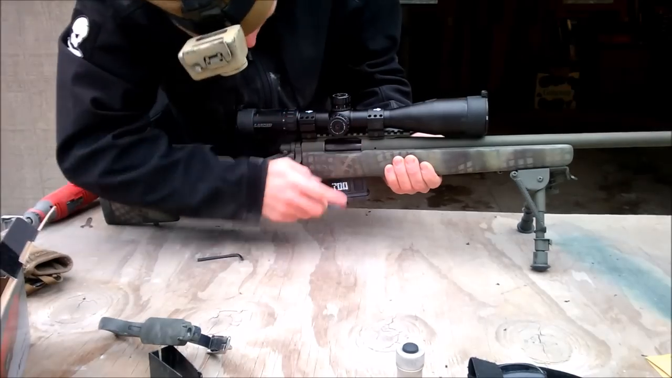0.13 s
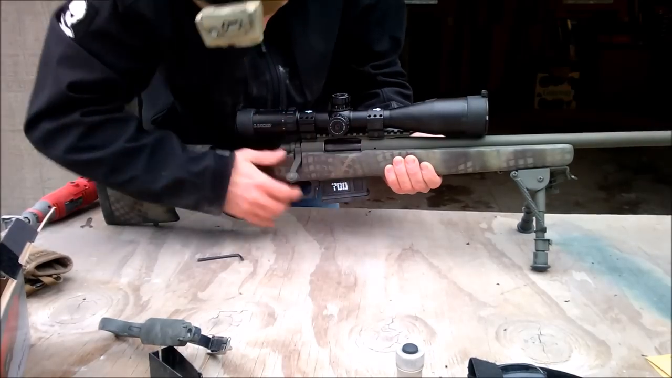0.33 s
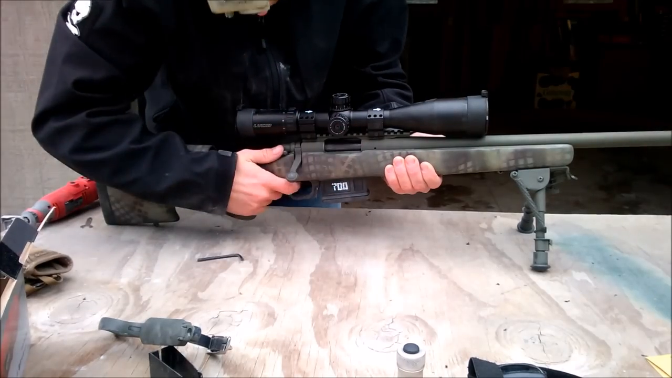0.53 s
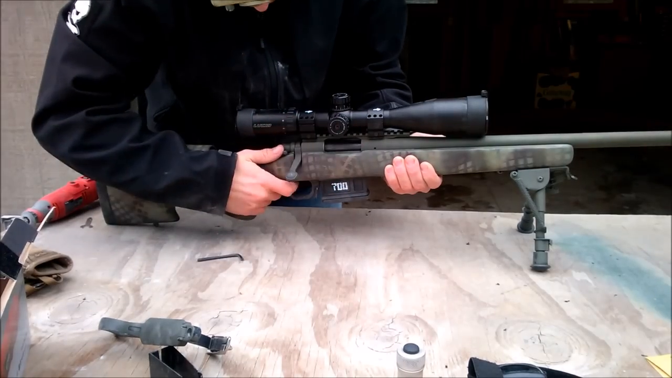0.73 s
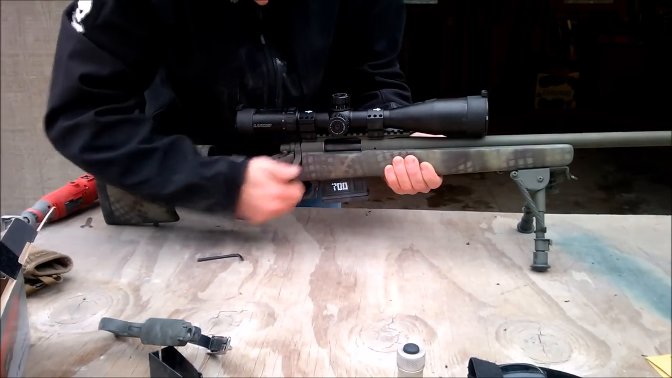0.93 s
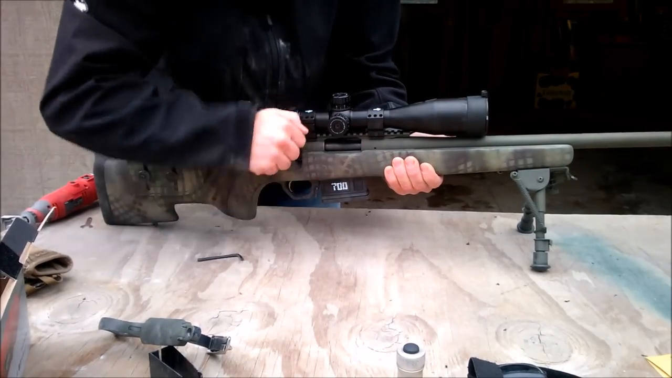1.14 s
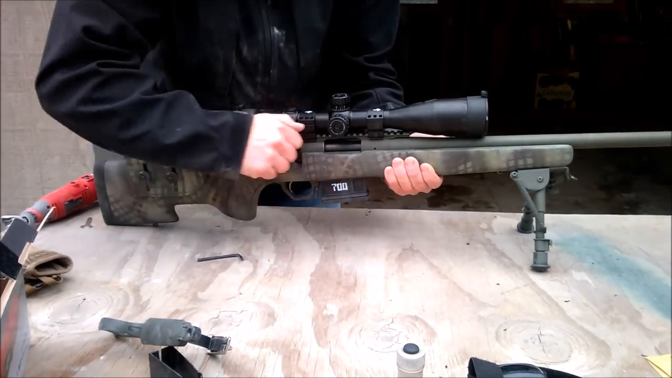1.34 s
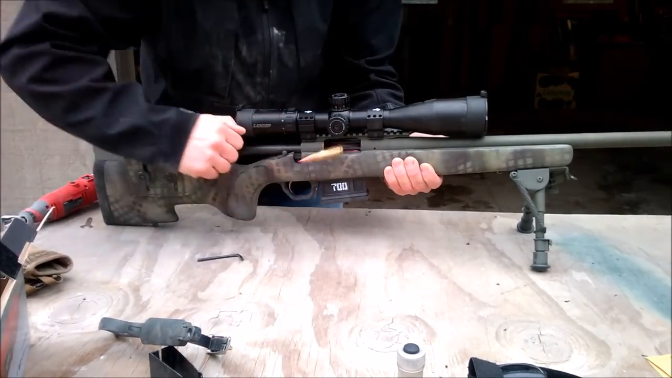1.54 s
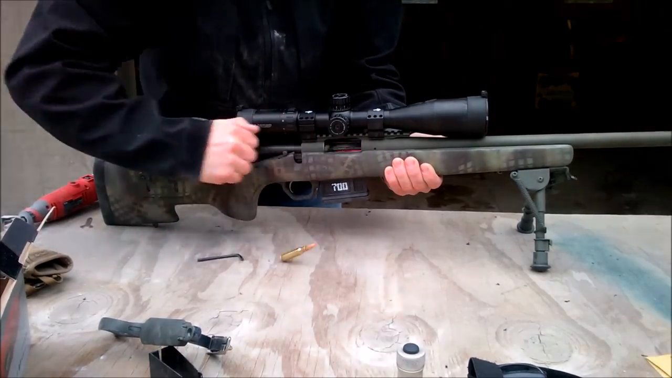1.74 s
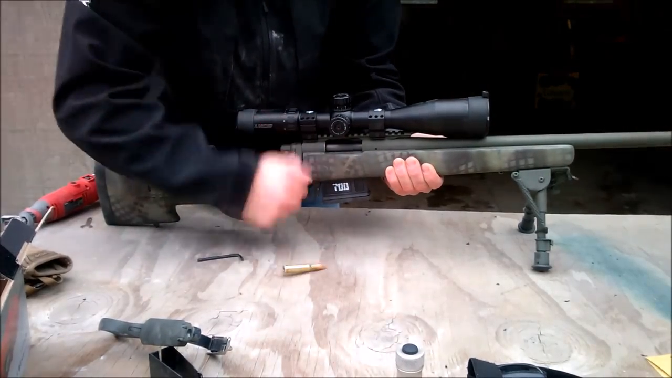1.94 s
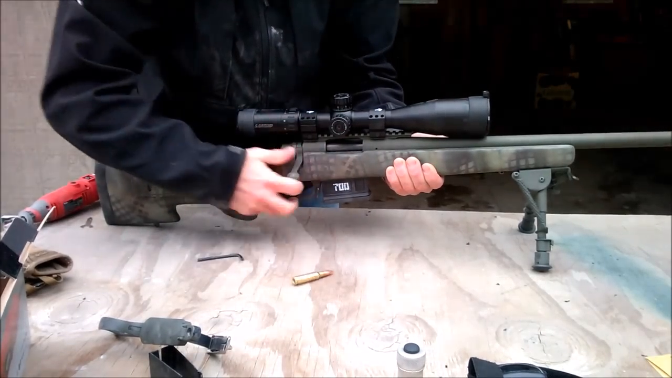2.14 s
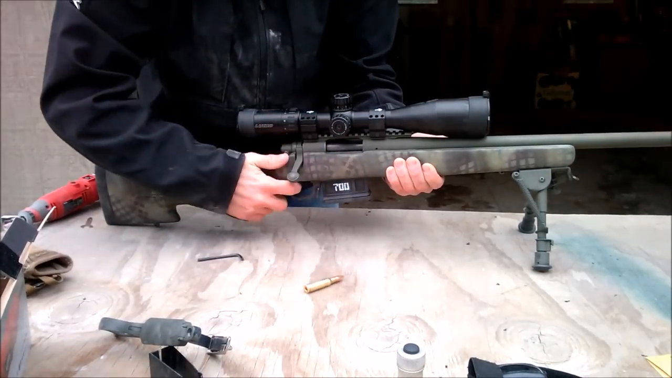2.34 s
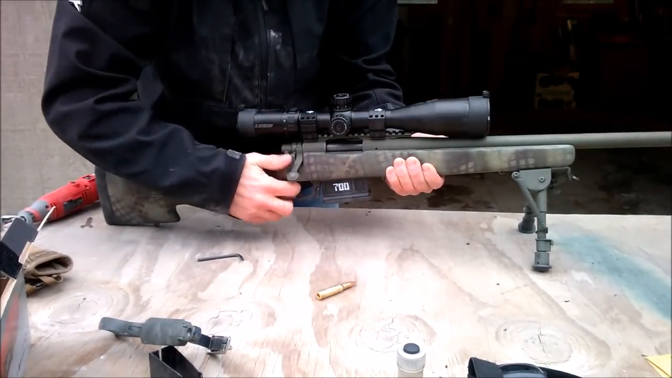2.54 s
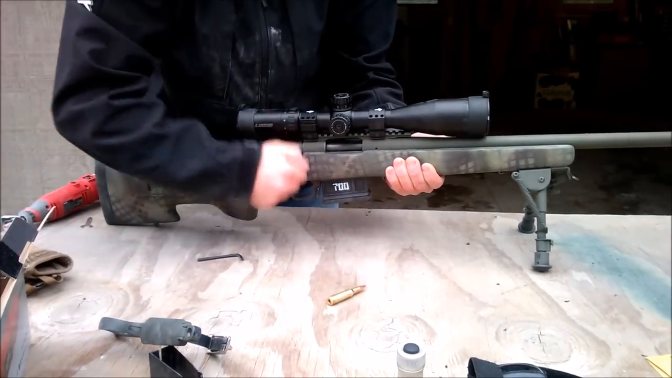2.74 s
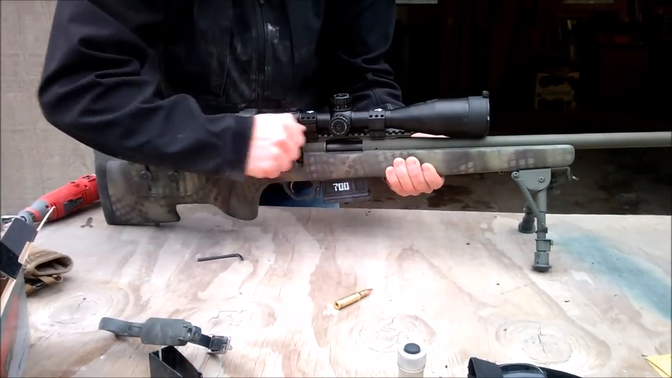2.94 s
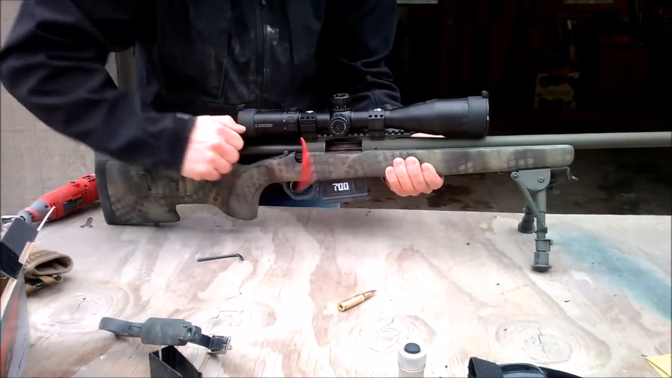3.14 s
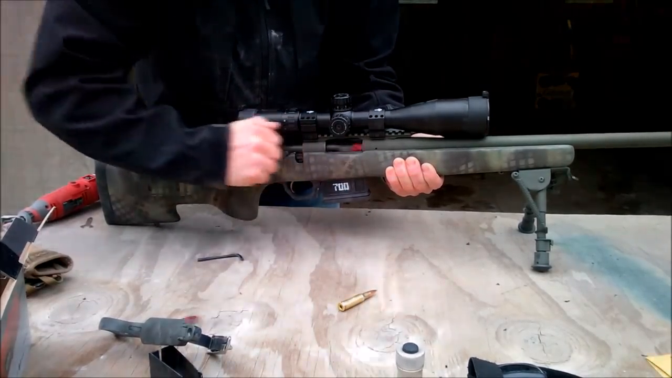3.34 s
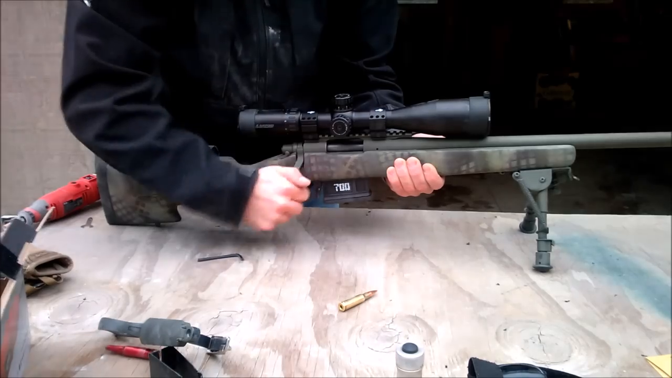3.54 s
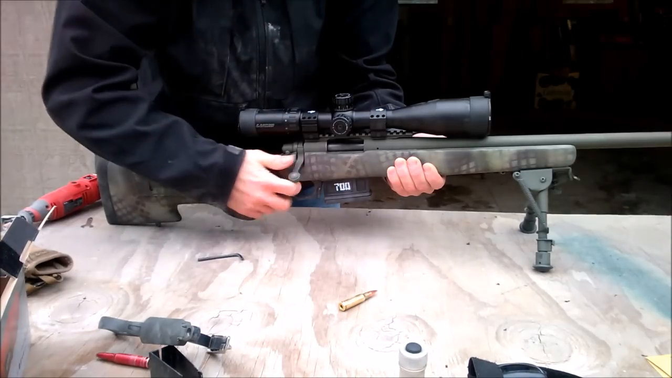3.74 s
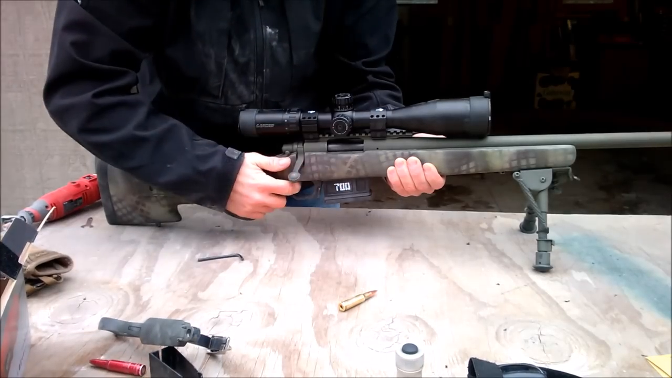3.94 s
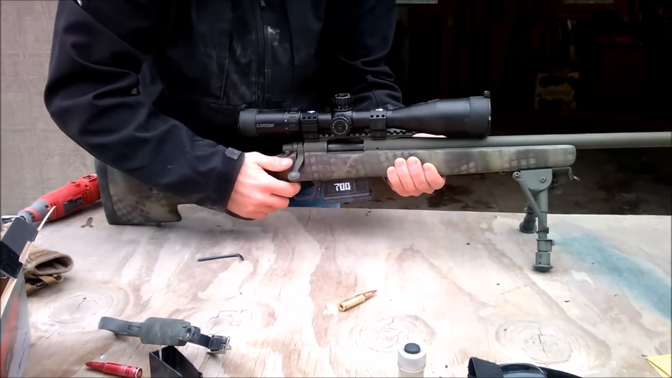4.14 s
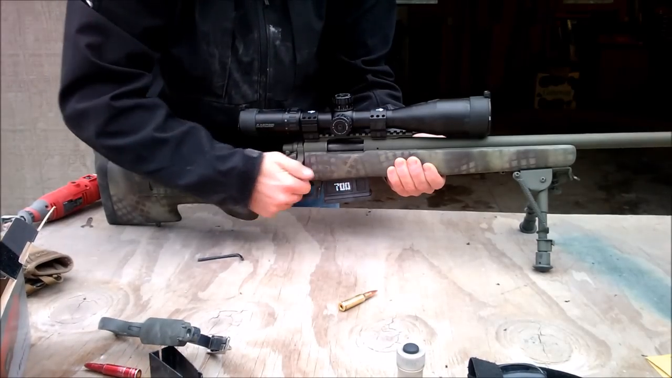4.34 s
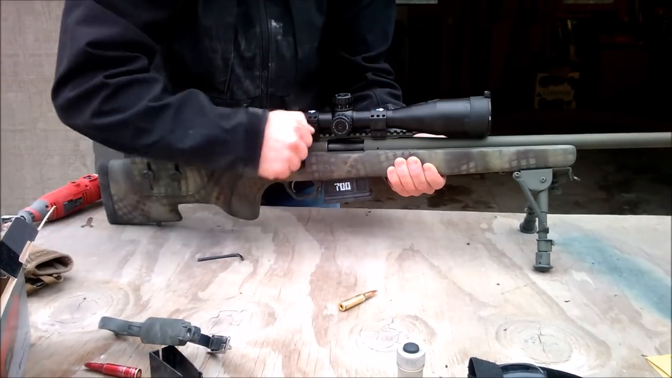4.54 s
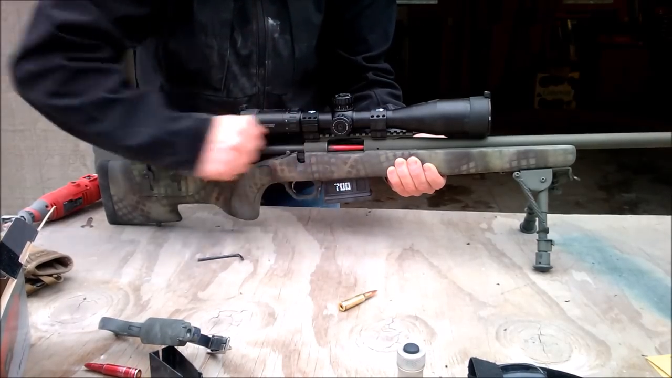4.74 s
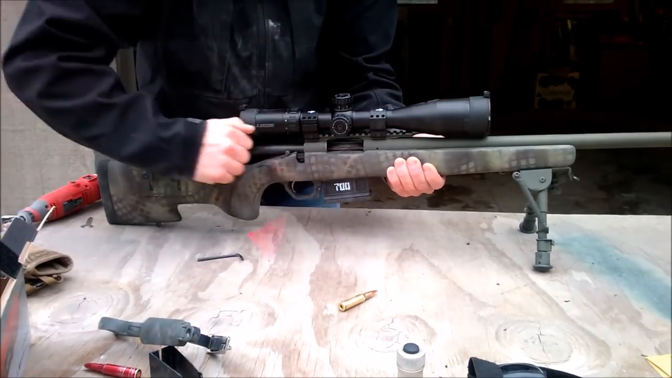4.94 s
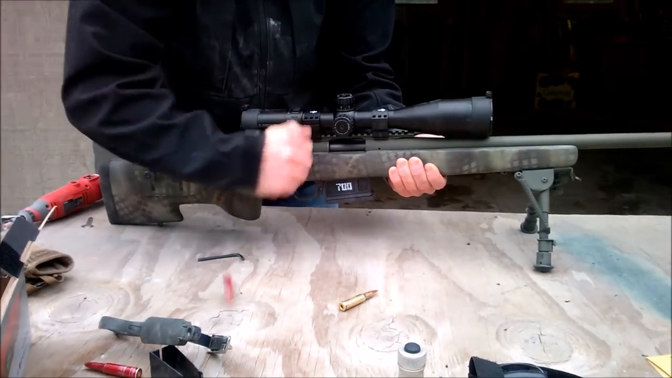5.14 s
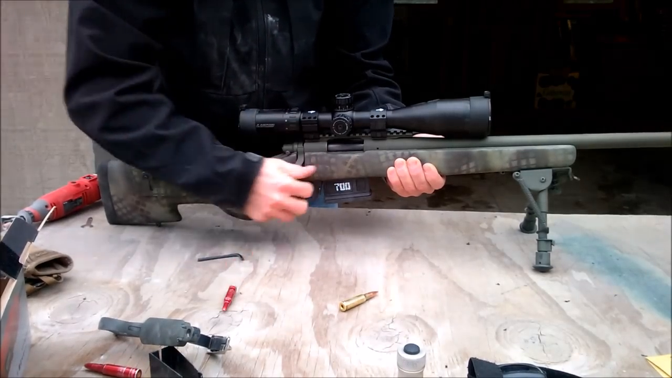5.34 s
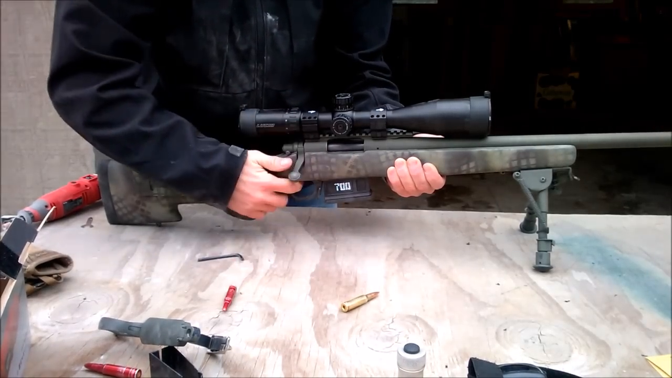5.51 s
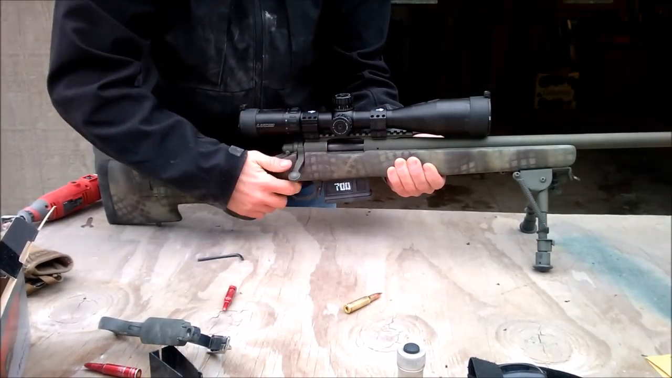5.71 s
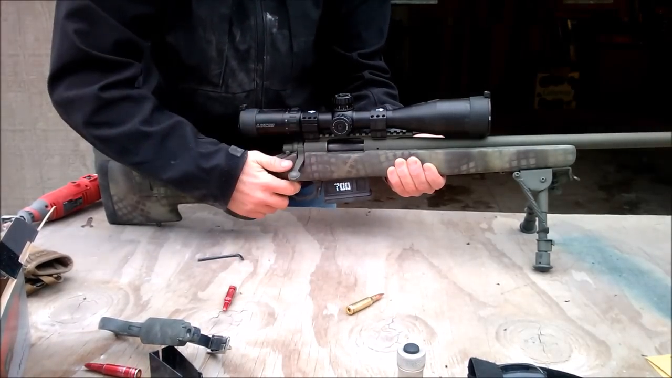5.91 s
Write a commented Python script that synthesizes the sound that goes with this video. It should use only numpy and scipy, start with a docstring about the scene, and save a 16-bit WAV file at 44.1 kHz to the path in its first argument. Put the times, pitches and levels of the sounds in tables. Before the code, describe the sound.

Steel clicks, short scrapes and empty trigger snaps from a bolt-action rifle, with cartridges bouncing on plywood in a workshop.

```python
"""A bolt-action rifle is dry-fired on a plywood bench in a workshop. First the bolt shuts and the striker
snaps, its impact ringing the steel. Then, three times, the handle lifts, the bolt scrapes back to its stop, an
ejected round bounces on the plywood, the bolt slides home and locks, and the striker snaps again. Throughout, a
loose round rocks on the bench, the bench rumbles under the hands, and the room echoes and hisses. A small
camera hears it all through two ports, with gain control."""
import sys
import numpy as np
from scipy import signal
from scipy.fft import rfft, irfft, next_fast_len
from scipy.io import wavfile
from scipy.ndimage import map_coordinates

SR = 44100
rng = np.random.default_rng(int(sys.argv[2]) if len(sys.argv) > 2 else 0)


def log_audio(samples):
    """Write samples as a 16-bit WAV file to the path given in sys.argv[1]."""
    # one column per channel
    frames = np.atleast_2d(samples).T
    # limit to full scale, then quantise
    limited = np.clip(frames, -1, 1)
    pcm = np.round(limited * 32767).astype(np.int16)
    wavfile.write(sys.argv[1], SR, pcm)


N = 267687

# striker snaps; soft taps of something rocking on the panel: (time [s], level [dB])
STRIKER = [(0.773, -4.5), (2.517, -6), (4.164, -4.5), (5.957, -5)]
ROCKING = [(0.419, -35), (0.48, -30), (0.518, -32.5), (3.844, -27), (3.916, -24.5), (3.981, -20.5),
           (4.051, -28), (4.112, -20), (4.368, -29.5), (4.446, -31), (5.491, -23.5), (5.55, -40),
           (5.63, -33), (5.729, -34.5)]
# steel contacts of the bolt's cycle: (time [s], force on the action [dB])
LIFT = [(1.197, -0.5), (2.9, -1.5), (4.605, -3)]  # the handle cams up
FREE = [(1.399, -12.5), (3.038, -16), (4.747, -11.5)]  # the lugs come clear
REAR = [(1.554, 2.7), (3.159, 8.7), (4.868, 8.3)]  # the bolt meets its rear stop
HOME = [(1.923, -1), (3.508, 3.5), (5.201, -3.5)]  # the bolt face meets the barrel
DOWN = [(0.172, -14.5), (2.061, -17), (3.64, -10), (5.335, -18.5)]  # the handle is pushed down
# what each contact passes on, levels relative to the action:
# (contacts, bench [dB], bolt [dB], rise [s], t60 [s], clack [dB])
PASSES = [(LIFT, -8.5, -.5, .004, 0.02, -16.5), (FREE, -18, -3, 0.0024, 0.019, -26),
          (REAR, -6.5, -0.71, .009, 0.031, -18.5), (HOME, -14, -1.5, .002, 0.017, -20.5),
          (DOWN, -0.69, -4.5, .003, 0.019, -9.5)]
# modes of the bench and of its top panel: (frequency [Hz], bandwidth [Hz], level [dB])
BENCH = [(146, 63, -4.5), (258, 40, 1.5), (332.7, 44, 5.5), (468, 173, 5)]
PANEL = [(651.7, 81, 0), (838, 120, -1.5), (1153, 150, -5), (1338, 69, -2.5), (1650, 230, -8)]
CLACK_S, SETTLE_S = .003004, .055  # delays: contact to square meeting, lift to the rifle dropping back


def striker(force):
    """Impact and rebound: the sear lets go, the striker hits its seat and bounces once."""
    for s, db in STRIKER:
        impact(force["bolt"], s - .002, db - 21, .03, .002, .5)  # sear
        impact(force["action"], s + .0022, db - 2.5, .022, .001, .6, blow=1.7)
        impact(force["action"], s + .0069, db - 6, .02, .001, .6, blow=9)  # rebound
        impact(force["bolt"], s + .0024, db + 4.5, .009, .0003, .6, blow=1.7)
        impact(force["bench"], s + .0033, db - 18.5, .03, .001, .3, blow=2.8)


def bolt_contacts(force):
    """Structure-borne sound: each steel contact shakes action and bolt and passes into the bench."""
    # ticks of bolt, handle and cartridges: (time [s], force [dB], bolt relative to action [dB])
    ticks = [(0.008, -7.5, 6.5), (0.097, -18, -25), (0.131, -18.5, 3), (1.104, -30, -6),
             (1.168, -21.5, -19), (1.493, -12.5, -12), (1.522, -11, 3.5), (1.544, -2, -20), (1.563, -9, 4),
             (1.864, -6, -10), (1.874, -9, 7), (2.889, -13, -13), (3.104, -20, 6), (3.128, -15, 7),
             (3.321, -27, -11), (3.411, -9, -9), (3.45, -0.5, 1.5), (3.555, -8.5, 4), (3.627, -17, -3.5),
             (4.817, -18, 7.5), (4.838, -9, 5.5), (5.023, -25.5, -0.5), (5.13, -9.5, 2), (5.154, -7, -12.5)]
    contacts = [(s, db, *kind) for rows, *kind, _ in PASSES for s, db in rows]
    contacts += [(s, db, -10, bolt_db, .003, .02) for s, db, bolt_db in ticks]
    for s, db, bench_db, bolt_db, rise, t60 in contacts:
        s -= rise / 2  # the parts scrape before they meet squarely
        impact(force["action"], s, db, t60, rise, .6)
        impact(force["bolt"], s, db + bolt_db, .78 * t60, rise, .6)
        impact(force["bench"], s, db + bench_db, .04, rise, .3)
        impact(force["panel"], s, db + bench_db + 3, .03, rise, .3)


def clacks(force):
    """Momentum transfer: parts meeting squarely drive a sharp blow into the plywood."""
    for rows, *_, clack_db in PASSES:
        for s, db in rows:
            impact(force["dent"], s + CLACK_S, db + clack_db, .012, .001, .5, blow=2.3)
            impact(force["panel"], s + CLACK_S, db + clack_db, .012, .001, .5, blow=7)


def bolt_slides(force):
    """Stick-slip friction: the bolt catches and slips in its raceway, loudest where it is fastest."""
    # (start [s], fastest [s], stop [s], scrape [dB], hiss relative to scrape [dB])
    slides = [(-.05, 0, .06, -28, -10), (1.41, 1.555, 1.61, -28, -6), (1.82, 1.89, 1.95, -34, -4),
              (2.8, 2.87, 2.92, -47, -9), (3.05, 3.155, 3.21, -30, -3), (3.43, 3.47, 3.54, -20, -6),
              (3.53, 3.57, 3.66, -39, -5), (4.5, 4.6, 4.63, -43, -14), (4.78, 4.865, 4.93, -27, -4),
              (5.09, 5.15, 5.25, -35, -6)]
    t = np.arange(N) / SR
    grit = rng.standard_normal((2, N)) * amp(4 * wobble(400) + 2 * wobble(70) - 3)
    for start, fastest, stop, db, hiss_db in slides:
        touch = np.clip(np.minimum(t - start, stop - t) / .019, 0, 1)
        level_db = db + np.interp(t, [start, fastest, stop], [-18, 0, -24.5])
        force["action"][:N] += touch * amp(level_db) * grit[0]
        force["bolt"][:N] += touch * amp(level_db + hiss_db) * grit[1]


def ejector(force):
    """Elastic release: the ejector spring flicks a round out with one short snap."""
    # (time [s], force [dB], bolt relative to ejector [dB])
    flicks = [(3.189, -6.5, 5), (4.9052, -0.5, -12.5)]
    for s, db, bolt_db in flicks:
        impact(force["spring"], s, db, .011, .001, .5)
        impact(force["bolt"], s, db + bolt_db, .009, .001, .5)


def falling_rounds(force):
    """Inelastic collision: at each landing a round touches the plywood three times, ever weaker."""
    # (time [s], force [dB], tapped spot relative to that force [dB])
    landings = [(1.7658, -3, -3.5), (1.7743, -4, -0.5), (2.027, -25.5, -10), (2.036, -16, -7.5),
                (2.075, -20, 0), (2.102, -22.5, -0.5), (2.132, -28.5, -19), (2.238, -35.5, -38),
                (2.298, -36.5, -31), (2.3075, -37, -32), (3.3691, -6.5, -12), (3.4317, -3.5, -1),
                (3.5453, -13, 1.5), (5.0934, -1, -16.5), (5.2788, -15.5, 14.5), (5.2831, -10.5, 6.5),
                (5.359, -18.5, -2), (5.403, -27.5, -16)]
    gap_s, loss_db = .0019, 5
    for s, db, spot_db in landings:
        for k in range(3):
            at = s + k * gap_s * rng.normal(1, .11)
            touch_db = db - k * loss_db
            impact(force["dent"], at, touch_db - 3.5, .007, .001, .5, blow=9.3)
            impact(force["tap"], at, touch_db + spot_db, .016, .001, .6, blow=2.9)
        impact(force["panel"], s, db - 3, .03, .002, .7, blow=6.4)
        impact(force["bench"], s, db - 7.5, .04, .002, .5, blow=6)
        impact(force["bolt"], s, db + spot_db - 26.5, .004, .0002, .5)


def bench_knocks(force):
    """Cushioned impact: the feet push and scuff the bench as the rifle settles and shifts, and a loose round
    rocks on the panel in soft taps."""
    # the rifle shifts: (time [s], push [dB])
    knocks = [(0.319, -33.5), (0.355, -37), (0.385, -40), (1.303, -31), (1.346, -33.5), (1.427, -30),
              (1.703, -34.5), (2.212, -31.5), (2.363, -37), (3.014, -27), (3.597, -18.5), (3.722, -28),
              (3.757, -38), (3.796, -35.5)]
    for s, db in LIFT:
        impact(force["push"], s + SETTLE_S, db - 20, .09, .003, .3, blow=26)
        impact(force["scuff"], s + SETTLE_S, db - 21, .09, .006, .3)
    for s, db in knocks:
        impact(force["push"], s + .003, db, .07, .003, .3, blow=4.5)
        impact(force["scuff"], s + .003, db + 10, .014, .001, .3, blow=7)
    for s, db in ROCKING:
        impact(force["scuff"], s, db - 5, .04, .002, .3)


def ring_tones():
    """Free vibration: single modes of struck parts die away as damped sinusoids."""
    # cartridges and small steel parts: (time [s], frequency [Hz], level [dB], t60 [s])
    pings = [(1.521, 12020, -37, .12), (1.554, 12020, -28, .2), (1.872, 12000, -24, 0.064),
             (2.145, 7000, -46, .05), (3.41, 3480, -19, .035), (3.555, 11400, -42, .25),
             (3.556, 5000, -24, .035), (4.748, 4500, -25, .03), (5.298, 3500, -30, .03)]
    # stock and firing pin: (frequency [Hz], level relative to the snap [dB], t60 [s])
    pin_modes = [(323, -28, .11), (565, -27, .06), (1225, -5, .032), (1690, -11, .025), (3430, -14, .08),
                 (4080, -14, .035), (10150, -14, .02)]
    panel_hz, receiver_hz, hollow_bench_hz = 370, 1200, 249.9
    rows = [(s, panel_hz * rng.normal(1, .02), db, .05, .0035) for s, db in ROCKING]
    rows += [(*ping, .002) for ping in pings]
    rows += [(s + .002, hz, db + mode_db, t60, .0005)
             for s, db in STRIKER for hz, mode_db, t60 in pin_modes]
    rows += [(s + CLACK_S, receiver_hz * rng.normal(1, .037), db - 23.5, .023, .0005) for s, db in REAR]
    rows += [(s + SETTLE_S, hollow_bench_hz, db - 24, .13, .001) for s, db in LIFT]
    out, t = np.zeros(N + SR), np.arange(SR // 3) / SR
    for s, hz, db, t60, rise in rows:
        envelope = amp(db - 60 * t / t60) * (1 - np.exp(-t / rise)) ** 2
        out[round(s * SR):][:len(t)] += envelope * np.sin(2 * np.pi * hz * t)
    return out[:N] * amp(3 * wobble(150))  # loose parts make every ring waver


def rifle():
    """Modal response: each body rings under its forces; wood sheds treble, rubber feet most of all."""
    # modes: (frequency [Hz], bandwidth [Hz], level [dB])
    action_modes = [(1220, 300, -1.5), (1525, 130, -4.5), (2090, 850, -10), (3040, 310, 0.5),
                    (3470, 360, -4), (4240, 580, -3.5), (5150, 1100, -8)]
    bolt_modes = [(5480, 1100, 0), (6750, 540, 0.5), (7920, 840, 1.5), (10000, 600, 1), (11200, 1100, 1),
                  (15000, 1700, -12.5)]
    spring_modes = [(3460, 410, 1), (4510, 700, -6.5), (5600, 1100, -7.5)]
    tap_modes = [(2250, 1800, -3.5), (3200, 1560, -0.5), (4570, 1400, -9.5)]  # the spot a round taps
    dent_modes = [(1450, 830, 0)]  # the plywood right under a hard blow
    modes = dict(action=action_modes, bolt=bolt_modes, spring=spring_modes, tap=tap_modes,
                 dent=dent_modes, bench=BENCH, panel=PANEL, push=BENCH, scuff=PANEL)
    force = {part: np.zeros(N + SR) for part in modes}
    for source in (striker, bolt_contacts, clacks, ejector, falling_rounds, bench_knocks, bolt_slides):
        source(force)
    ring = {part: ringing(force[part][:N], modes[part]) for part in modes}
    steel = ring["action"] + ring["bolt"] + ring["spring"]
    wood = soft(ring["bench"], 870) + soft(ring["panel"] + ring["tap"], 5170) + soft(ring["dent"], 2660)
    feet = soft(ring["push"], 302) + soft(ring["scuff"], 447)
    return steel + wood + feet + ring_tones()


def hand_load():
    """Loading and relaxation, in dB: hands lean on the bench while the bolt is open, then ease off."""
    load_db, rest_db, lean_s, relax_db_per_s = -57, -84., .04, 52.5
    t, level_db = np.arange(N) / SR, np.full(N, rest_db)
    for (lift, _), (down, _) in zip([(-lean_s, 0)] + LIFT, DOWN):
        building = (rest_db - load_db) * np.clip(1 - (t - lift) / lean_s, 0, 1)
        relaxing = relax_db_per_s * np.maximum(t - down, 0)
        level_db = np.maximum(level_db, load_db + building - relaxing)
    return level_db


def handling():
    """Forced vibration: the loaded bench rumbles and small things roll on it; gives (shared, per port)."""
    # (frequency [Hz], spectral density [dB])
    spectrum = [(20, -9), (45, -0.5), (90, -12.5), (150, 1.5), (250, -12), (500, -14), (1000, -67.5)]
    load_db = hand_load()
    rumble = coloured_noise(spectrum)
    bumps = unit(rng.standard_normal(N) * amp(5.5 * wobble(35)))
    rattle = soft(ringing(bumps, BENCH) + amp(-3) * ringing(bumps, PANEL), 1200)
    rumble *= amp(load_db + 2.8 * wobble(12))
    return rumble[0] + amp(.48 * load_db - 22) * rattle, amp(-7) * rumble[1:]


def workshop_echoes(x):
    """Reflection: a dull near wall, bench clutter and diffuse tails answer; gives (shared, per port)."""
    # reverberation time: (frequency [Hz], t60 [s])
    decay = [(200, 0.71), (1200, 0.32), (10000, 0.3), (16000, 0.14)]
    tails, step = np.zeros((3, N + SR)), SR // 3
    for start in range(0, N, step):  # a fresh tail every third of a second avoids steady ringing tones
        hz, t, noise = signal.stft(rng.standard_normal((3, SR * 2 // 5)), SR, nperseg=256)
        tail = signal.istft(noise * amp(-60 * t / along(decay, hz)[:, None]), SR, nperseg=256)[1]
        answer = signal.fftconvolve(x[None, start:start + step], tail / np.linalg.norm(tail[0]), axes=1)
        tails[:, start + 250:start + 250 + answer.shape[1]] += answer
    delayed = np.pad(x, (round(.0148 * SR), 0))[:N]
    wall = filtered(delayed, lambda hz: 1 / (1 + 1j * hz / 4000))
    near = rng.standard_normal((2, SR // 40)) * amp(-60 * np.arange(SR // 40) / SR / .022)
    clutter = signal.fftconvolve(x[None], near / np.linalg.norm(near[0]), axes=1)[:, :N]
    shifting = amp(-7) * clutter * [wobble(120), wobble(120)]  # hands and parts move the reflections
    return amp(-12.5) * wall + amp(-16.5) * tails[0, :N], amp(-23) * tails[1:, :N] + shifting


def room_hiss():
    """Partial coherence: steady room noise is only partly alike at the two ports."""
    # (frequency [Hz], spectral density [dB])
    spectrum = [(25, -4.5), (90, -6), (165, 3), (370, -7.5), (700, -9.5), (1250, -17.5), (2100, -14),
                (3500, -13), (6200, -18.5), (10000, -18), (15200, -20.5)]
    air = coloured_noise(spectrum)
    return ports(amp(-63) * air[0], amp(-65) * air[1:], column=2)


def ports(shared, apart, column):
    """Stereo widening: the right channel has a delayed, phase-turned, coloured copy of the shared sound."""
    # right relative to left: (frequency [Hz], rifle [dB], room hiss [dB])
    right_gain = [(60, -4, -1.5), (394.3, -14, -11), (704, -8.5, -7.5), (1310, 0, -4.5), (1770, 0, -0.5),
                  (4800, -6.5, -2), (7450, -2, 2.5), (9540, 1, 9.5), (12600, -4.5, 0.5), (15500, -1, -2.5)]
    # (frequency [Hz], phase turn [rad])
    right_phase = [(150, 1.3), (400, 2.23), (750, 0.82), (1300, 3.01)]
    lag_s = 16 / SR
    colour = lambda hz: amp(along(right_gain, hz, column))
    turn = lambda hz: np.exp(1j * (along(right_phase, hz) - 2 * np.pi * hz * lag_s))
    right = filtered(shared, lambda hz: colour(hz) * turn(hz)) + filtered(apart[1], colour)
    return np.array([shared + apart[0], right])


def impact(track, s, db, t60, rise, spiky, blow=0):
    """Rough contact: adds an impulse of size blow and a burst of tiny hits that swells and decays."""
    t = np.arange(SR // 8) / SR
    hits = rng.standard_normal(len(t)) * np.exp(spiky * rng.standard_normal(len(t)) - spiky ** 2)
    shape = (1 - np.exp(-t / rise)) ** 2 * amp(-60 * t / t60)
    burst = shape * hits * np.linalg.norm(shape) / np.linalg.norm(shape * hits)
    track[round(s * SR):][:len(t)] += amp(db) * (burst + blow * (t == 0))


def ringing(x, modes):
    """Resonance: x drives modes of alternating sign; white noise keeps its rms."""
    def response(hz):
        total = sum((-1) ** k * amp(db) * 1j * hz * width / (centre ** 2 - hz ** 2 + 1j * hz * width)
                    for k, (centre, width, db) in enumerate(modes))
        return total / np.sqrt(np.mean(abs(total) ** 2))
    return filtered(x, response)


def soft(x, corner_hz):
    """Contact compliance: a two-pole low-pass."""
    return filtered(x, lambda hz: 1 / (1 + 1j * hz / corner_hz) ** 2)


def coloured_noise(spectrum):
    """Three independent noises of one spectrum, at rms 1."""
    return unit(filtered(rng.standard_normal((3, N)), lambda hz: amp(along(spectrum, hz))))


def filtered(x, response):
    """x times a complex response of frequency."""
    size = next_fast_len(N + SR // 2)
    return irfft(rfft(x, size) * response(np.fft.rfftfreq(size, 1 / SR)), size)[..., :N]


def along(points, hz, column=1):
    """One column of a table, interpolated over log frequency."""
    table = np.transpose(points)
    return np.interp(np.log(hz + 1), np.log(table[0] + 1), table[column])


def wobble(rate):
    """A smooth random curve, rate knots a second."""
    return map_coordinates(rng.standard_normal(int(N * rate / SR) + 4), [np.arange(N) * rate / SR])


def amp(db):
    return 10 ** (np.asarray(db) / 20)


def unit(x):
    return x / np.sqrt(np.mean(x ** 2) + 1e-20)


def scene():
    """Superposition: rifle, echoes, handling and hiss add at the two ports."""
    gun = rifle()
    echoes, echoes_apart = workshop_echoes(gun)
    hiss = room_hiss()
    hands, hands_apart = handling()
    return ports(gun + echoes + hands, echoes_apart + hands_apart, column=1) + hiss


def record(dry):
    """Compression: gain ducks after loud sounds and recovers slowly; peaks clip; the band is limited."""
    memory_s, knee_db, top_hz = .2, -33.5, 15900
    pole = np.exp(-1 / (memory_s * SR))
    power = signal.lfilter([1 - pole], [1, -pole], np.mean(dry ** 2, 0))
    ducked = dry * (1 + power / amp(knee_db) ** 2) ** -.12
    clipped = np.clip(ducked, -.96, .96)
    return filtered(clipped, lambda hz: np.clip((top_hz + 750 - hz) / 1400, 0, 1) ** 2)


dry = scene()
out = record(dry)
log_audio(out)
```